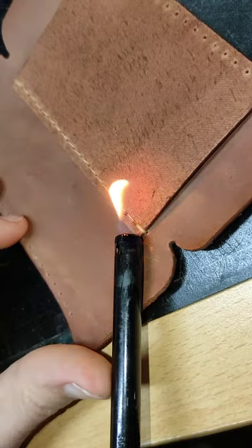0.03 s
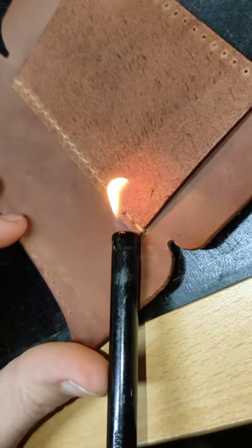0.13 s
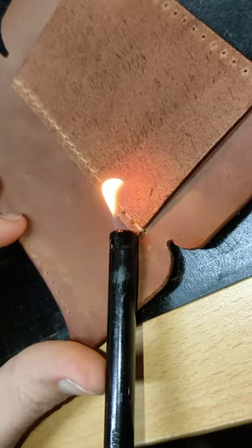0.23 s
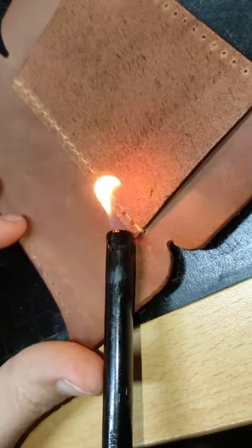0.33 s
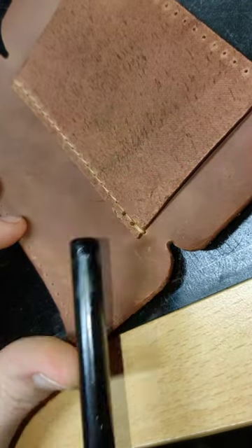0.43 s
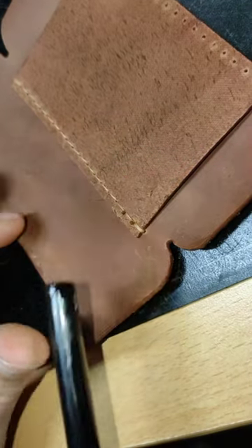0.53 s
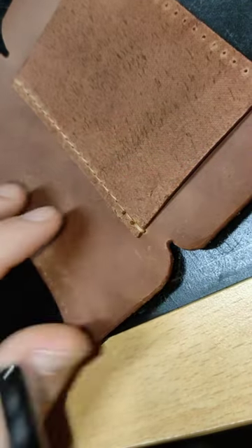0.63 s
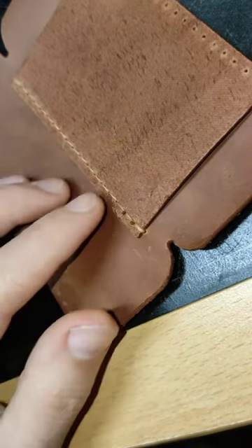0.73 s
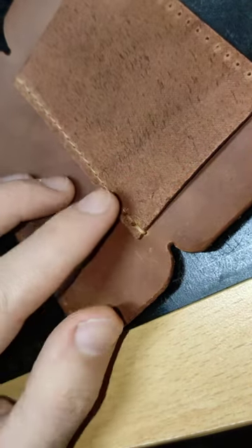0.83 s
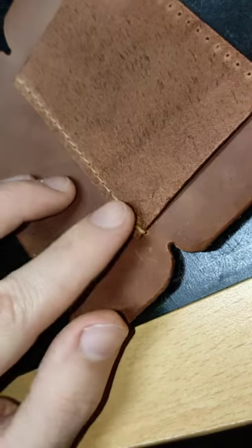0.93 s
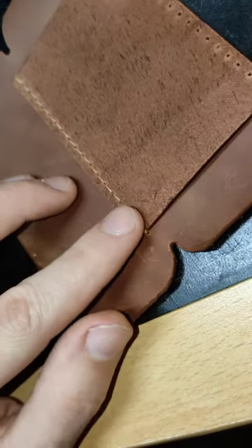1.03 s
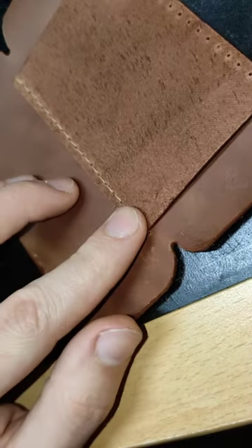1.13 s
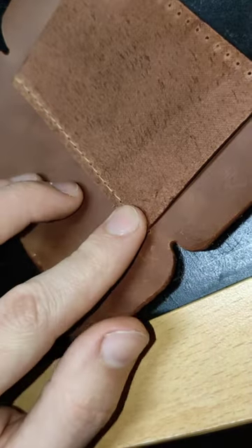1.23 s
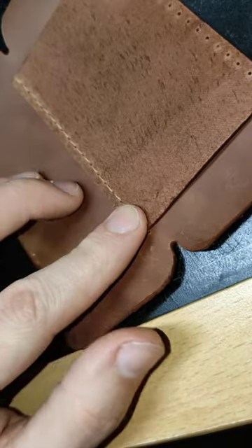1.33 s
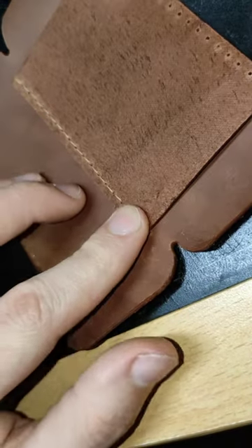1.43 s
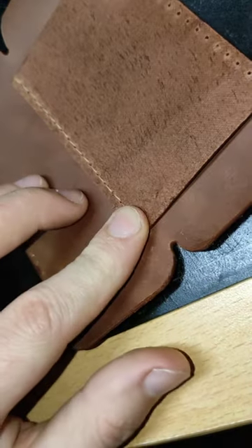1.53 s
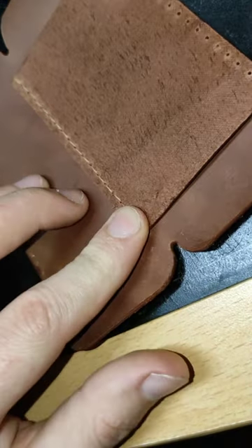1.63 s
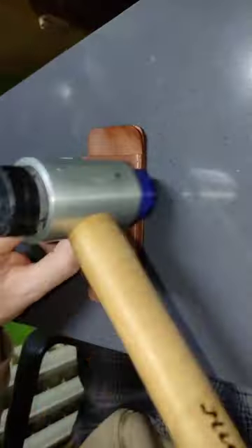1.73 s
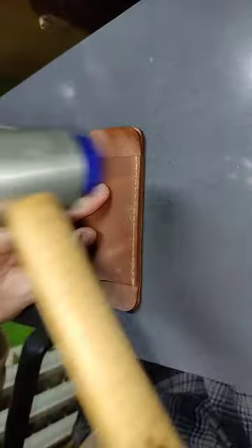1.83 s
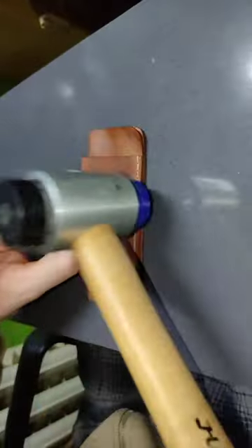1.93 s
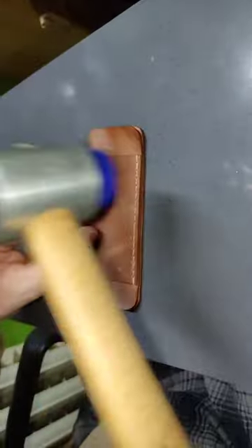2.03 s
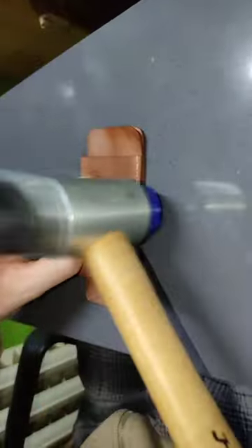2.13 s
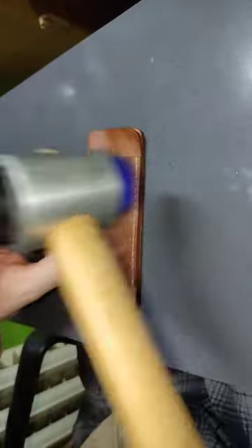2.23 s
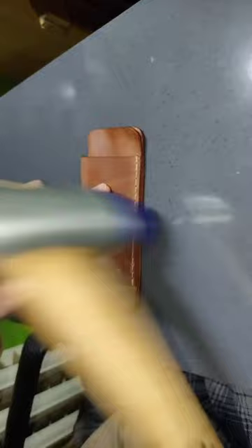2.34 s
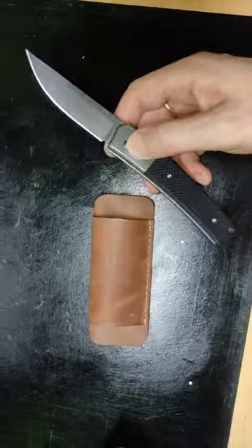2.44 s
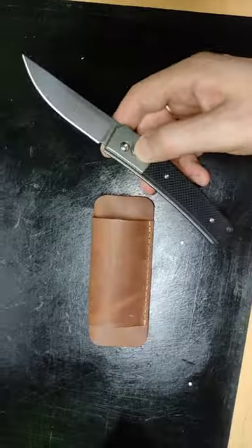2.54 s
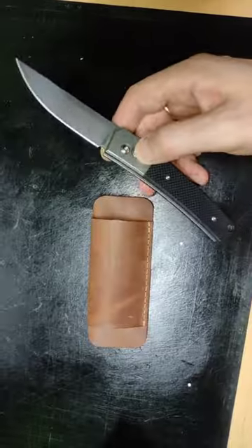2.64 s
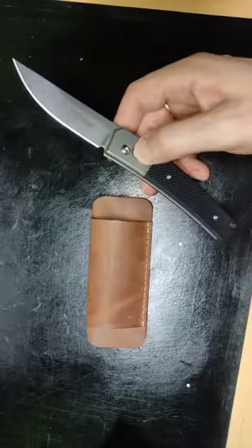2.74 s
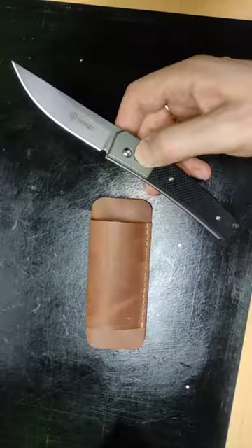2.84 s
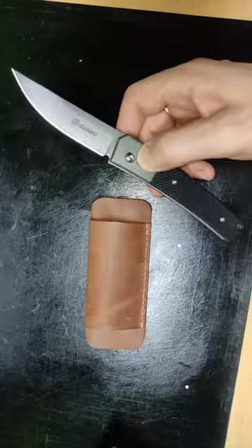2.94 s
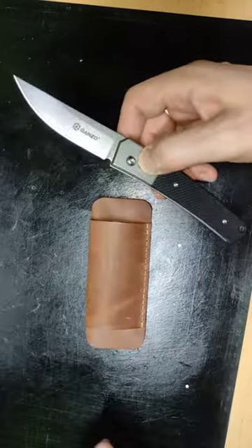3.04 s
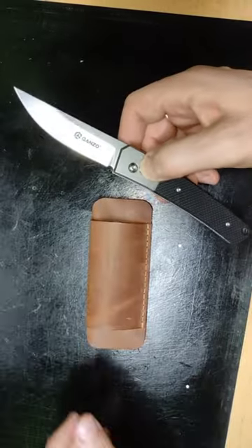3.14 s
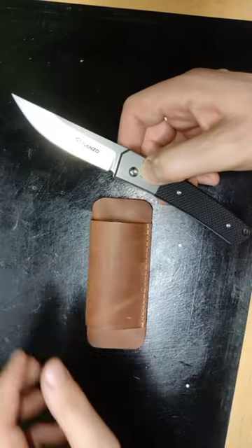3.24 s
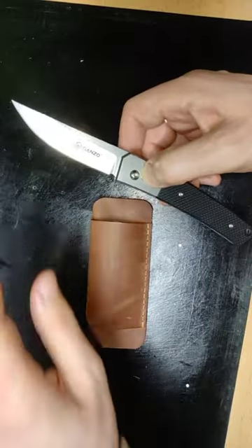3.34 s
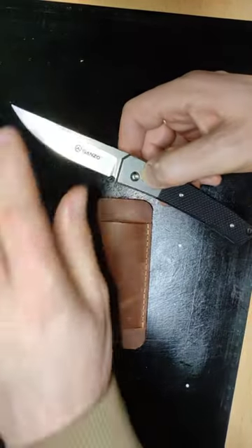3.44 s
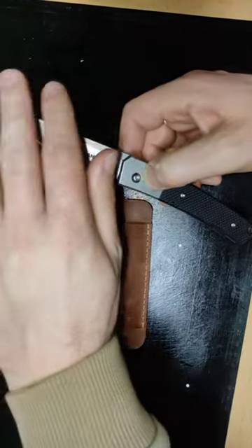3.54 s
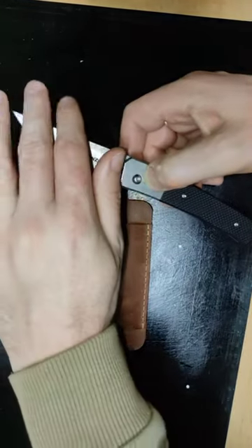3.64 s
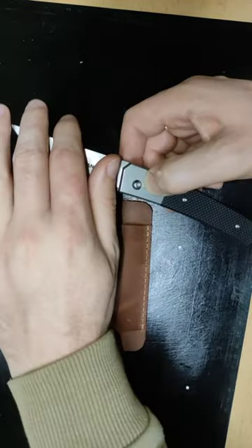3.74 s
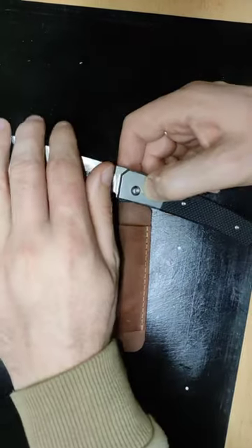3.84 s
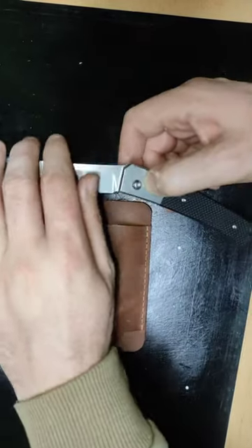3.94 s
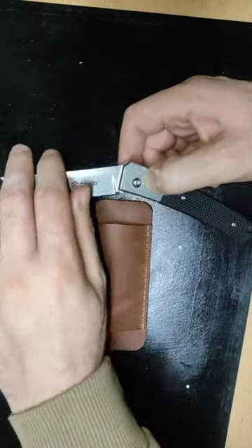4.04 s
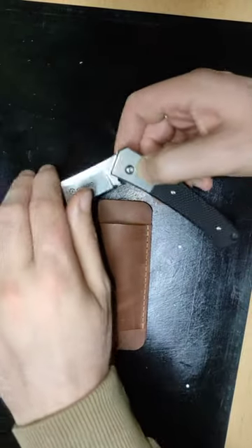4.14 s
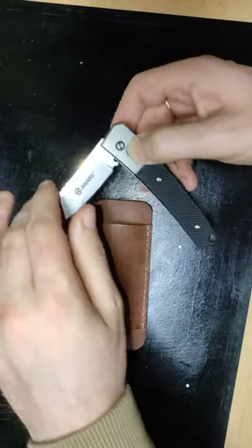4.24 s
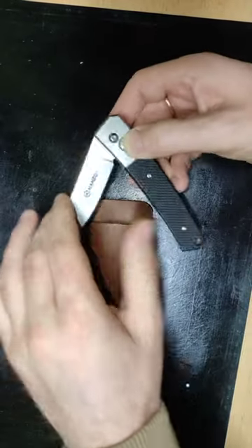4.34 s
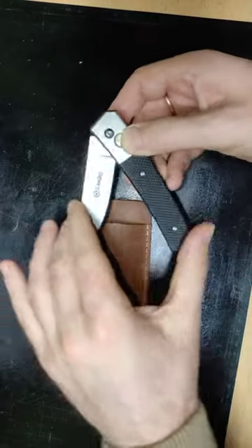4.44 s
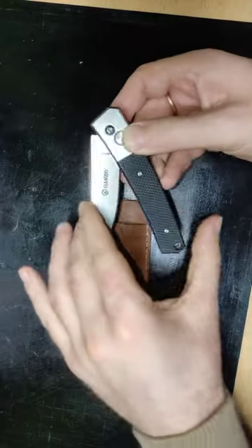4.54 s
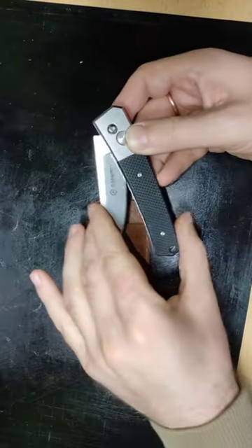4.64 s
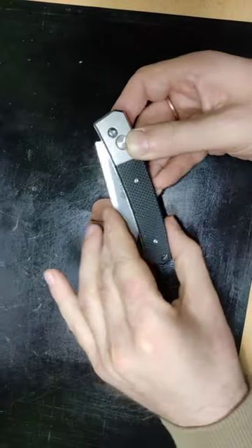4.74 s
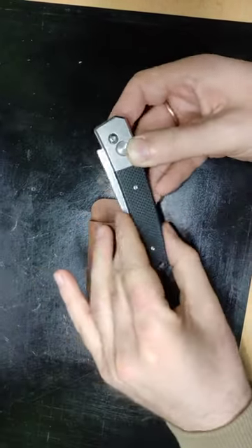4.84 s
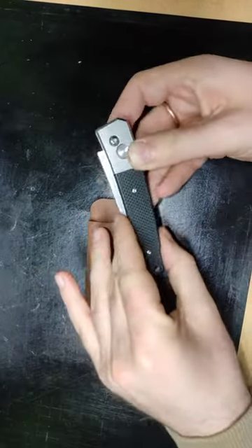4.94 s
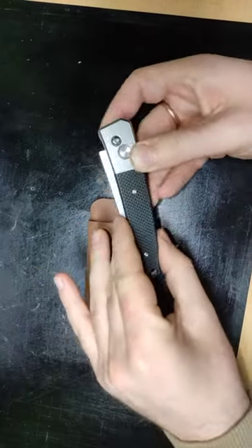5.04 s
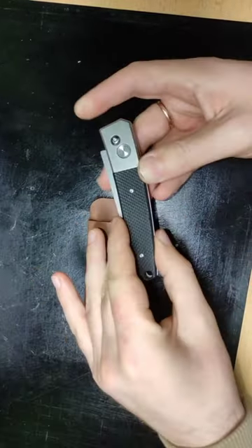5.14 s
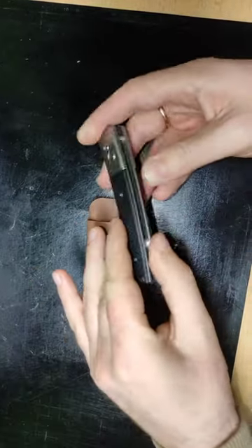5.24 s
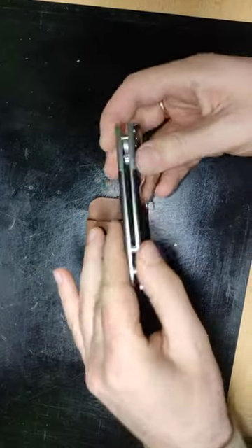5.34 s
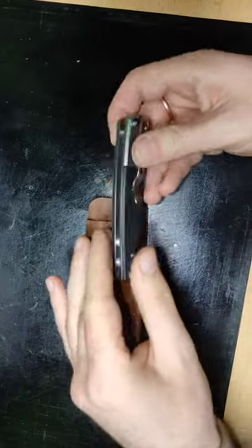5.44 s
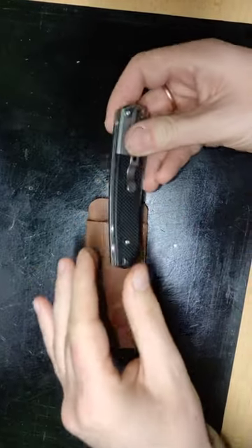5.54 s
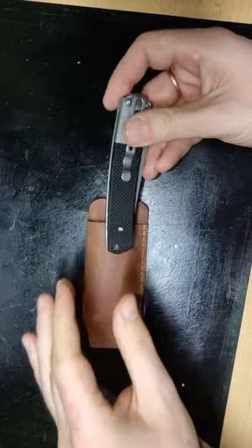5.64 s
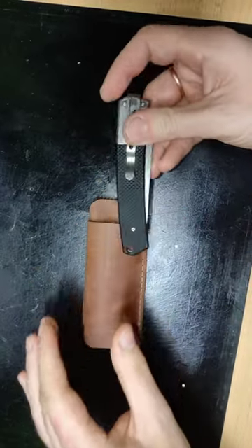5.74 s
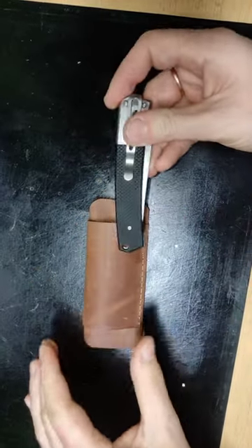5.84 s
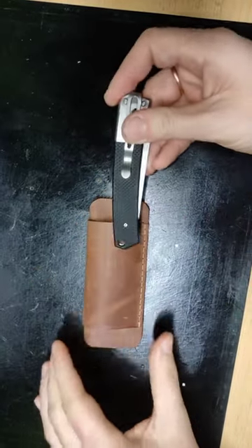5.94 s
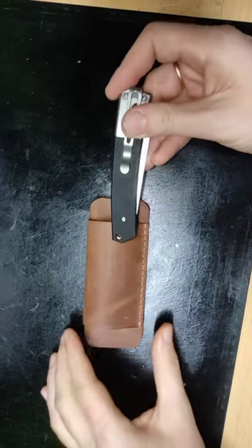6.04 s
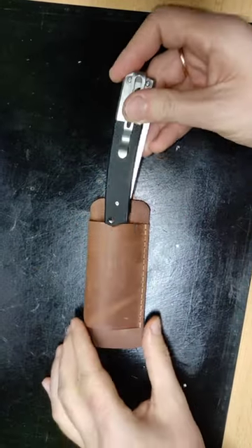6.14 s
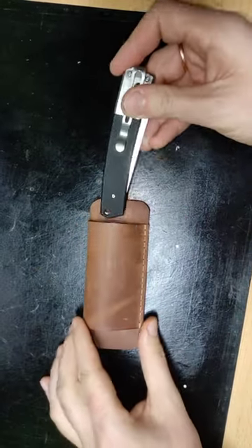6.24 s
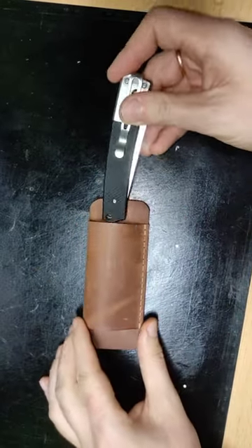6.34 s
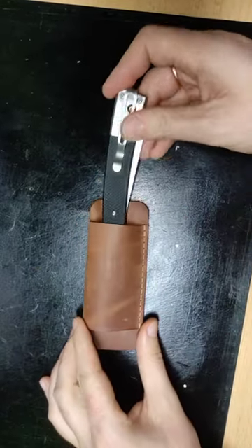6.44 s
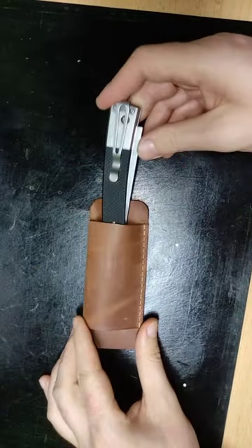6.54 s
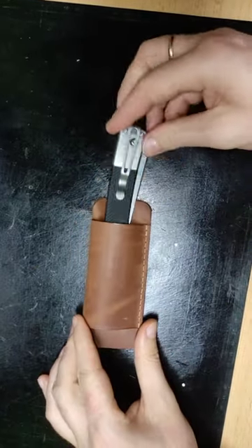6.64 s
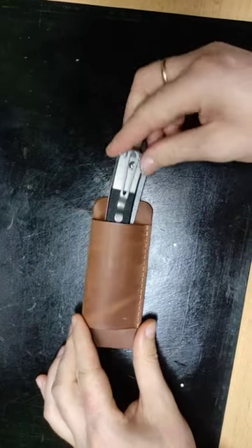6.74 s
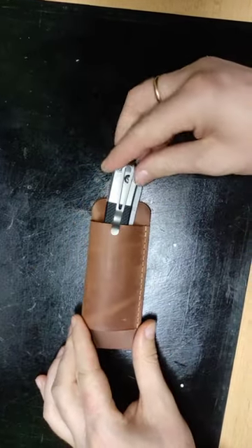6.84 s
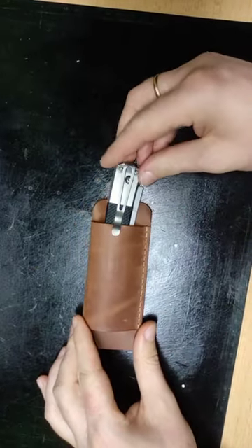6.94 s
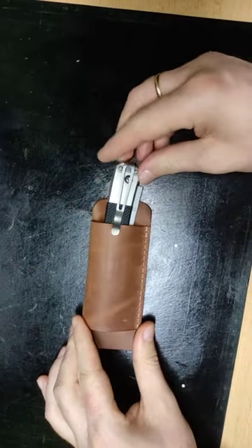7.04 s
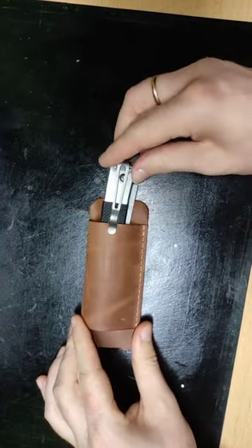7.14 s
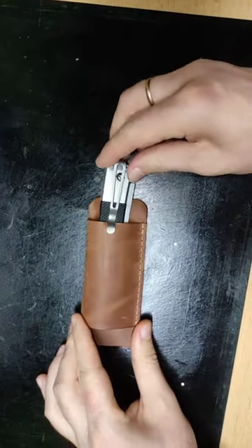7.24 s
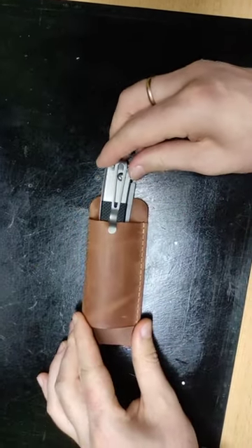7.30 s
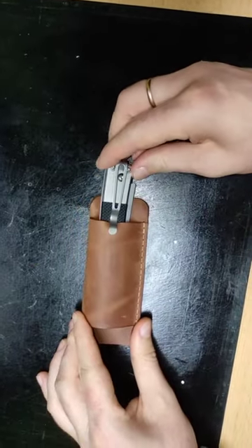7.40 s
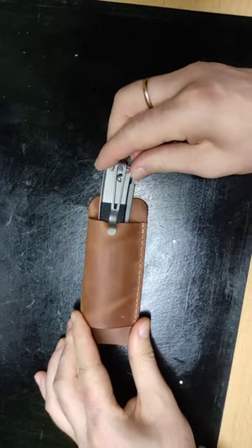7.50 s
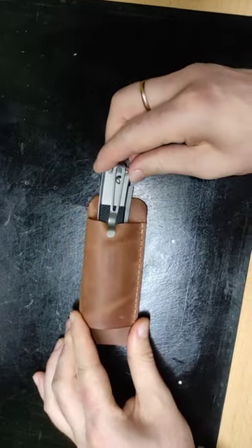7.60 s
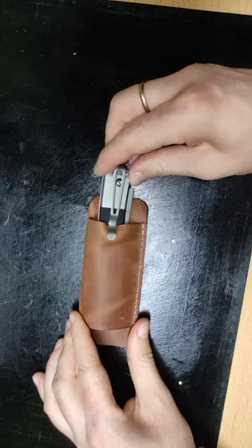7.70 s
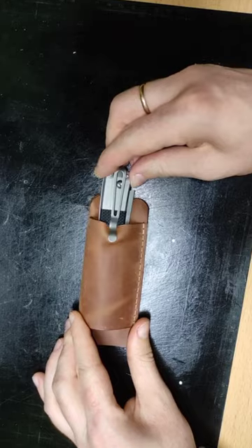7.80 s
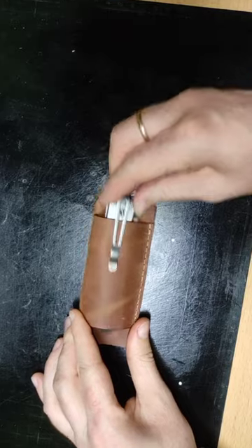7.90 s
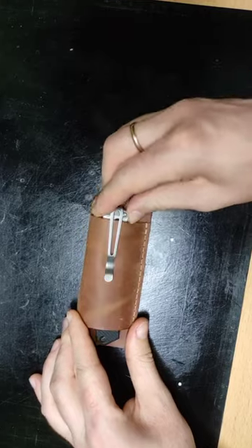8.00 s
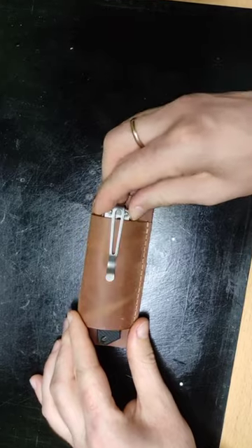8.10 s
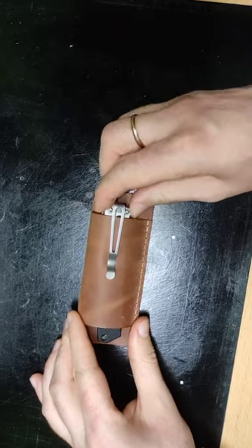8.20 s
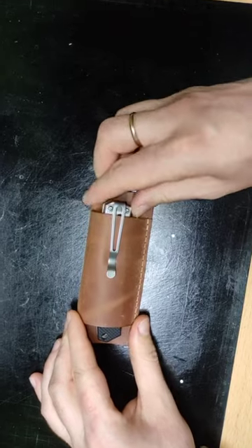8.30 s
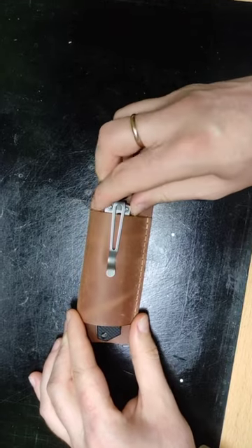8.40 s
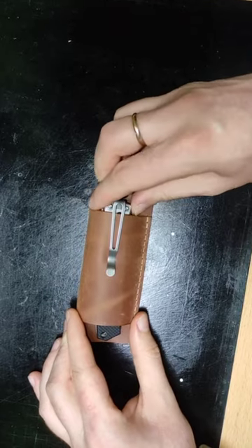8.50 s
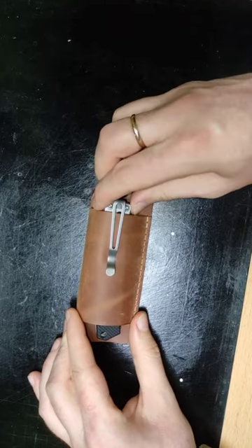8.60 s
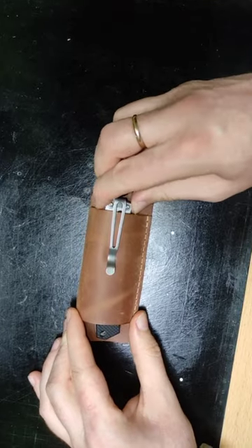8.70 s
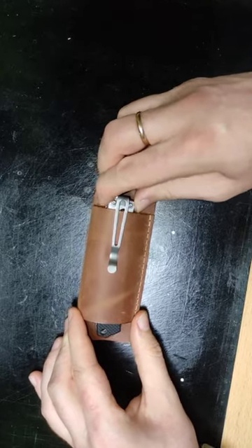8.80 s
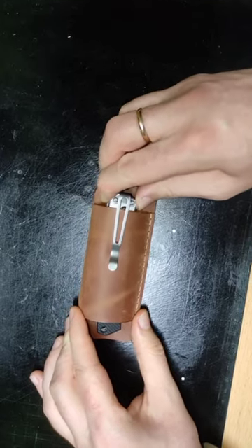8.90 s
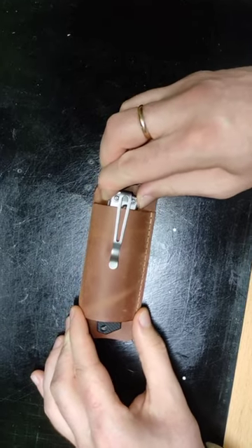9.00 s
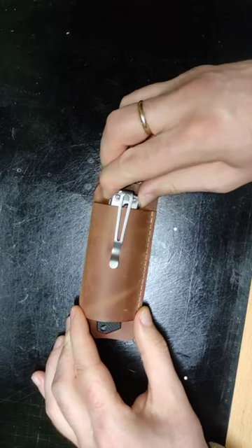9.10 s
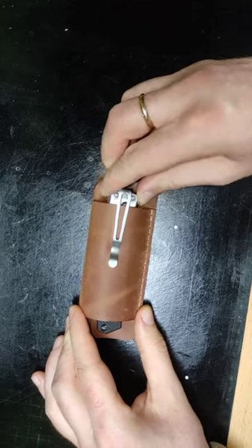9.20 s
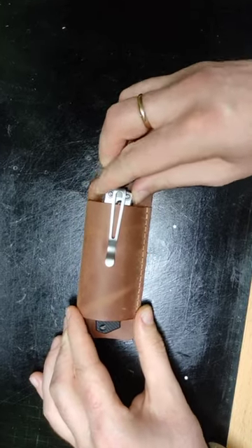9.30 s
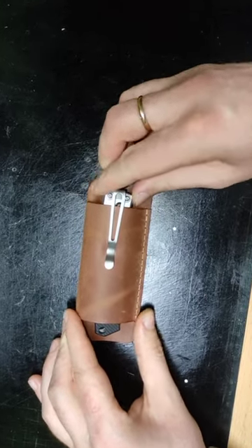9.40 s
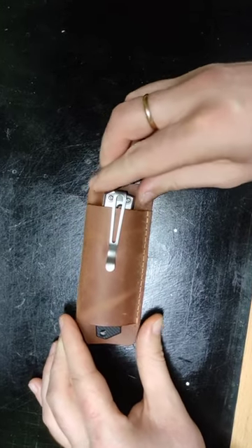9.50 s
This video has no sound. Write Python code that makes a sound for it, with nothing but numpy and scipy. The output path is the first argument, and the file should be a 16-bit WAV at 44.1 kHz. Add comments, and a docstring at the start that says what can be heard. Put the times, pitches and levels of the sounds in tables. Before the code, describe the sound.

Close stereo phone pickup in a small, quiet room with soft low rumble and faint hiss. A lighter trigger clicks sharply around half a second, leaving a faint metallic ring. After a pause, a mallet cracks and thuds four times on leather. A folding knife gives small, faint steel ticks, then slides into a tight sheath with short dry rubs and catches. Two tight pairs of hard bumps knock the phone's holder near the end.

```python
"""Leatherwork close to a phone in a small room, over quiet coloured noise with bumps through the phone's holder.
A lighter clicks at a thread end (noise bursts and damped modes); the grip creeps on steel and leather (slip noise).
A mallet strikes a seam four times (modal thuds, cracks, a handle knock); a folding knife's pivot and lock tick.
Last, the knife is pushed into its tight sheath: filtered slip noise rubs and catches tick."""
import sys
import numpy as np
from scipy import signal
from scipy.fft import rfft, irfft
from scipy.io import wavfile
from scipy.ndimage import uniform_filter1d

SR = 44100
rng = np.random.default_rng(int(sys.argv[2]) if len(sys.argv) > 2 else 0)


def transcribe(signal):
    """Save signal, clipped to [-1, 1], as a 16-bit WAV file at the path in sys.argv[1]."""
    frames = np.atleast_2d(signal).T
    limited = np.clip(frames, -1, 1)
    pcm = np.round(limited * 32767).astype(np.int16)
    wavfile.write(sys.argv[1], SR, pcm)


N = 421596
TIME = np.arange(N) / SR
RING = TIME[:SR // 2 + SR // 4]  # time axis of one struck sound, 0.75 s


def undb(db):
    """Decibels to gain."""
    return 10 ** (np.asarray(db) / 20)


def decay(t, t60_s):
    """Exponential decay by 60 dB in t60_s."""
    return np.exp(-np.log(1000) * t / t60_s)


def at_hz(points, hz):
    """Read (hz, value) points on a log-frequency axis."""
    point_hz, value = np.transpose(points)
    return np.interp(np.log(np.maximum(hz, 1)), np.log(point_hz), value)


def colour(x, points, tilt_db_per_oct=0, size=2048):
    """Minimum-phase filter with the given spectrum, tilted about 4 kHz (tilt is flat below 500 Hz)."""
    hz = np.arange(size // 2 + 1) * SR / size
    db = at_hz(points, hz) + tilt_db_per_oct * np.log2(np.maximum(hz, 500) / 4000)
    # fold the cepstrum to make the filter causal
    cepstrum = irfft(np.log(undb(db)))
    cepstrum[1:size // 2] *= 2
    cepstrum[size // 2 + 1:] = 0
    impulse = irfft(np.exp(rfft(cepstrum)))
    return signal.oaconvolve(x, impulse)[:len(x)]


def unit(x):
    """Scale to standard deviation 1."""
    return x / np.std(x)


def peak(x):
    """Scale to peak 1."""
    return x / np.abs(x).max()


def add(track, start_s, x):
    """Mix a sound into a track at a time."""
    i = int(start_s * SR)
    track[..., i:i + x.shape[-1]] += x[..., :N - i]


def ring(modes):
    """Damped sines of a struck object; successive modes have opposite polarity."""
    out = np.zeros(len(RING))
    for k, (hz, level_db, t60_s) in enumerate(modes):
        t = RING[RING < 2 * t60_s]
        gain = (-1) ** k * undb(level_db)
        out[:len(t)] += gain * decay(t, t60_s) * np.sin(2 * np.pi * hz * t)
    return out


def contact(t60_s, tone, tilt_db_per_oct=0, size=4096):
    """Hard touch: a decaying noise burst of micro-impacts, peak 1."""
    burst = rng.standard_normal(size) * decay(RING[:size], max(t60_s, 1e-3))
    burst = peak(colour(burst, tone, tilt_db_per_oct))
    return np.pad(burst, (0, len(RING) - size))


def walk(rate_hz):
    """Smoothed random wander with spread 1."""
    k = max(int(SR / rate_hz), 1)
    steps = np.repeat(rng.standard_normal(N // k + 1), k)
    return unit(uniform_filter1d(steps, k)[:N])


def swell(start_s, length_s, attack_s, sag_db_per_s, release_s, margin_s=.3):
    """Gain of one rub: it grows up to its start, sags while held, then dies away."""
    gain = np.zeros(N)
    first = max(int((start_s - margin_s) * SR), 0)
    span = slice(first, int((start_s + length_s + margin_s) * SR))
    age_s = TIME[span] - start_s
    rise = np.minimum(age_s, 0) / max(attack_s, 1e-3)
    fall = np.maximum(age_s - length_s, 0) / max(release_s, 1e-3)
    gain[span] = np.exp(rise - fall) * undb(-sag_db_per_s * np.clip(age_s, 0, length_s))
    return gain


def pair(length, apart_hz=900):
    """Diffuse noise at two close ports: alike in the bass, less related in the treble."""
    mid, side = rng.standard_normal((2, length))
    side = colour(side, [(apart_hz / 6, -12), (apart_hz, -3), (2 * apart_hz, 0)])
    return np.array([mid + side, mid - side])


# reverberation time per band: hz, t60_s
REVERB_T60 = [(150, 0.3), (400, 0.35), (1500, 0.28), (6000, 0.31), (14000, 0.089)]
# reverberation spectrum: hz, level_db
REVERB_TONE = [(60, -8.5), (180, 0.5), (380, 1), (800, -3.5), (1500, -6.5), (3000, -5.5), (7000, -3.5),
               (15000, -4)]


def room(build_s=0.00063):
    """Dense reflections from bench and near walls; each band dies at its own rate."""
    noise = rfft(pair(len(RING)))
    hz = np.linspace(0, SR / 2, noise.shape[1])
    centres_hz, t60s_s = np.transpose(REVERB_T60)
    tail = 0
    for share, t60_s in zip(np.eye(len(centres_hz)), t60s_s):
        band = irfft(noise * at_hz(np.c_[centres_hz, share], hz), len(RING))
        tail = tail + band * decay(RING, t60_s)
    tail = tail * np.minimum(RING / build_s, 1) ** 2
    return [colour(side / np.linalg.norm(side), REVERB_TONE) for side in tail]


# shading by the phone's body, left minus right, before each source's shade factor: hz, difference_db
PORT_SHADE = [(150, 0.5), (700, -3.5), (1600, -0.5), (3300, -12), (6500, -18), (9000, -17.5), (13000, -6.5)]


def place(x, lag_ms, shade, room_db, lean_db=1.1):
    """Direct sound reaches the left port later and shaded; the room answers from all round, leaning right."""
    t = TIME[:len(x)]
    late = np.interp(t - lag_ms / 1000, t, x)
    left = colour(late, [(hz, shade * db / 2) for hz, db in PORT_SHADE])
    right = colour(x, [(hz, -shade * db / 2) for hz, db in PORT_SHADE])
    wet = np.array([signal.oaconvolve(x, side)[:len(x)] for side in room()])
    wet_gain = undb(room_db + np.array([[-lean_db], [lean_db]]))
    return np.array([left, right]) + wet_gain * wet


def clicks(events, tone, modes, contact_t60_s, spot_db, spot_t60_s, vary_db=0):
    """Small contacts ring the touched spot and the whole object, whose mode levels may vary per click."""
    track = np.zeros(N)
    for start_s, level_db, tilt_db_per_oct, pitch_hz in events:
        body = ring([(hz, db + vary_db * rng.standard_normal(), t60_s) for hz, db, t60_s in modes])
        touch = contact(contact_t60_s, tone, tilt_db_per_oct)
        spot = ring([(pitch_hz, spot_db, spot_t60_s)])
        add(track, start_s, undb(level_db) * (touch + spot + body))
    return track


def friction(tone, grain_db, patchy_db, rate_hz=3000):
    """Fibres catch and let go: random slips of uneven size, coming in patches."""
    slips = np.zeros(N)
    caught = rng.random(N) < rate_hz / SR
    size_db = grain_db * np.minimum(rng.exponential(size=N)[caught], 4)
    size_db = size_db + patchy_db * walk(90)[caught]
    slips[caught] = rng.standard_normal(N)[caught] * undb(size_db)
    return unit(colour(slips, tone))


# background spectrum: hz, level_db
AIR_TONE = [(15, -49.5), (25, -20.5), (91, -3), (204, -2.5), (246, -5), (445, -9.5), (598, -15),
            (684, -13.5), (970, -19), (1050, -19), (1140, -18.5), (2060, -25), (3000, -25.5), (5140, -30.5),
            (15500, -33)]
AIR_DB = -64.3  # centre of the wander


def air():
    """Room rumble and microphone hiss as one coloured noise pair, wandering slightly in level."""
    noise = np.array([colour(side, AIR_TONE) for side in pair(N, apart_hz=500)])
    return undb(AIR_DB + .4 * walk(5.6)) * noise / np.std(noise.mean(axis=0))


# bumps reaching the phone's holder: start_s, level_db
HOLDER_BUMPS = [(.100, -35.5), (2.866, -38.5), (4.313, -32), (4.709, -40), (4.909, -37.5), (4.930, -38.5),
                (6.991, -35), (7.935, -32.5), (7.995, -32), (8.146, -43), (8.288, -36), (8.720, -37.5),
                (8.803, -36), (8.833, -25), (8.931, -37.5), (9.1392, -8.5), (9.1443, -11), (9.193, -34.5),
                (9.228, -33.5), (9.252, -10), (9.259, -12), (9.459, -27)]
# holder modes felt by the left microphone: hz, level_db, t60_s
HOLDER_LEFT_MODES = [(90, -26, 0.0074), (200, -9, 0.016), (344, 7, .017)]
# holder modes felt by the right microphone: hz, level_db, t60_s
HOLDER_RIGHT_MODES = [(450, -3, 0.0028), (737, 2.5, 0.0075), (1420, 0.5, 0.0039), (3340, 2, 0.0025)]
# spectrum of a catch, also of the holder's tick: hz, level_db
CATCH_SPECTRUM = [(200, -11), (700, -2.5), (1600, 7), (2500, -8.5), (4000, -7), (6300, -9), (9000, -14.5),
                  (12000, -19.5), (15000, -26.5)]
# push time scale at a given level, and the level rise that halves it
PUSH_MS, PUSH_AT_DB, PUSH_HALVING_DB = 1.18, -9, 10.5


def holder(low_hz=80, tick_db=-8, tick_tilt_db_per_oct=-5):
    """Bumps drive the holder's modes, dry; harder pushes are shorter and excite the stiff right side more."""
    track = np.zeros((2, N))
    spring = signal.butter(3, low_hz, "high", fs=SR, output="sos")
    for start_s, level_db in HOLDER_BUMPS:
        push_ms = PUSH_MS * 2 ** ((PUSH_AT_DB - level_db) / PUSH_HALVING_DB)
        age = RING * 1000 / push_ms
        push = signal.sosfilt(spring, age * np.exp(-6 * age))
        left = peak(signal.fftconvolve(push, ring(HOLDER_LEFT_MODES))[:len(RING)])
        right = peak(signal.fftconvolve(push, ring(HOLDER_RIGHT_MODES))[:len(RING)])
        right = right + undb(tick_db) * contact(0.0024, CATCH_SPECTRUM, tick_tilt_db_per_oct)
        right = undb(1.0 - 3.3 * push_ms) * right
        add(track, start_s, undb(level_db) * np.array([left, right]))
    return track


# lighter clicks: start_s, level_db, tilt_db_per_oct, pitch_hz (touched spot)
LIGHTER_CLICKS = [(0.215, -21, 1, 8020), (0.311, -35, -7.5, 4600), (0.343, -38, 2, 3690),
                  (0.401, -35, -2, 8370), (0.4545, -16.5, -0.5, 2690), (0.502, -6.5, -1.5, 3290),
                  (0.545, -30, 1.5, 1500)]
# click and slide spectrum: hz, level_db
LIGHTER_SPECTRUM = [(100, -19), (500, -21), (900, -0.5), (1700, 1.5), (3100, -2.5), (5000, -6),
                    (8300, -5.5), (11000, -7.5), (15000, -16)]
# shell and trigger modes: hz, level_db, t60_s
SHELL_MODES = [(1493, -21, .01), (3184, -18, .006), (4700, -25.5, .007), (8650, -15, 0.014)]
# metal tube modes: hz, level_db, t60_s
TUBE_MODES = [(1250, -44, .66), (1422, -54, 0.27), (4580, -43, .13), (6383, -56, 0.26), (8226, -55.5, 0.23)]
TRIGGER_S, TRIGGER_LENGTH_S, TRIGGER_DB = .428, .04, -50


def lighter():
    """The trigger clicks, slides and snaps back; the hardest snap sets the tube ringing."""
    snaps = clicks(LIGHTER_CLICKS, LIGHTER_SPECTRUM, SHELL_MODES,
                   contact_t60_s=.007, spot_db=-10, spot_t60_s=0.012)
    travel = swell(TRIGGER_S, TRIGGER_LENGTH_S, attack_s=.02, sag_db_per_s=41.5, release_s=.025)
    slide = undb(TRIGGER_DB) * travel * friction(LIGHTER_SPECTRUM, grain_db=-1.0, patchy_db=5.0)
    track = place(snaps + slide, lag_ms=.5, shade=.7, room_db=-7.5, lean_db=1.3)
    hardest_s = max(LIGHTER_CLICKS, key=lambda row: row[1])[0]
    add(track, hardest_s, ring(TUBE_MODES) * undb(np.array([[0], [-4.5]])))  # left, right
    return track


# steel and leather catching: start_s, level_db, tilt_db_per_oct
CATCH_EVENTS = [(1.6783, -38, -6), (6.3863, -40, -1.5), (6.9394, -47, 0.5), (7.0236, -45.5, -2),
                (7.077, -48.5, -0.5), (7.1526, -41.5, 0.5), (7.1646, -39, -2.5), (7.2249, -38, -6.5),
                (7.3417, -47, 0), (7.4321, -40.5, -0.5), (7.4415, -36, 2), (7.5574, -34, 2.5),
                (7.677, -38, 0.5), (7.883, -28.5, 0.5), (8.1108, -46.5, -2), (8.2209, -46, 4.5),
                (8.2857, -33.5, 0), (8.387, -42, -1), (8.4055, -38.5, 0), (8.4582, -32.5, -0.5),
                (8.6044, -42, 1.5), (8.7191, -31, -5), (8.744, -39.5, 5), (8.849, -42, -9),
                (8.8794, -46.5, -6.5), (9.042, -38, -4), (9.0692, -35.5, -0.5), (9.5012, -35, -2)]
# sheath-on-bench modes: hz, level_db, t60_s
SHEATH_MODES = [(215.8, -20.5, 0.17), (850, -16, .01), (1351, -23.5, .006)]
CATCH_HZ, CATCH_SPREAD_OCT = 1450, .2


def catches():
    """Steel snags on leather, each time ringing another spot near one pitch."""
    events = []
    for row in CATCH_EVENTS:
        pitch_hz = CATCH_HZ * 2 ** (CATCH_SPREAD_OCT * rng.standard_normal())
        events.append((*row, pitch_hz))
    return clicks(events, CATCH_SPECTRUM, SHEATH_MODES,
                  contact_t60_s=0.017, spot_db=-14.0, spot_t60_s=0.016, vary_db=4.5)


# grip shifts on steel and leather: start_s, length_s, level_db, body_db (relative)
GRIP_SHIFTS = [(1.679, 0.074, -63.5, 4.5), (3.002, 0.021, -65.5, -12), (3.251, 0.3, -74, -10),
               (4.148, 0.49, -76.5, -3.5), (4.67, 0.059, -73, -13), (5.38, 0.24, -71.5, -23),
               (7.075, .03, -70.5, 4), (7.306, 0.05, -67, 5.5), (7.686, 0.096, -65, 2),
               (8.167, 0.14, -73, 7.5), (8.72, 0.21, -75, 10.5), (9.042, .27, -72.5, 8)]
# rubbing hiss spectrum: hz, level_db
RUB_SPECTRUM = [(400, -18), (1100, -2.5), (1600, -1.5), (2300, -3), (3500, -6), (5500, -7), (8500, -13.5),
                (11000, -15.5), (15000, -19)]
# low body spectrum of rubbing: hz, level_db
BODY_SPECTRUM = [(60, -9.5), (130, -4.5), (215, 3.5), (450, -12.5), (900, -2.5), (1300, -6.5), (1700, -5),
                 (2300, -15), (5000, -41.5)]
GRIP_ATTACK_S, GRIP_SAG_DB_PER_S, GRIP_RELEASE_S = 0.014, 3.5, 0.035


def fingers():
    """Skin and leather creep under a shifting grip: slip noise gated by swells."""
    hiss = friction(RUB_SPECTRUM, grain_db=3.0, patchy_db=4.5, rate_hz=4800)
    body = friction(BODY_SPECTRUM, grain_db=4.5, patchy_db=1.0, rate_hz=270)
    track = 0
    for start_s, length_s, level_db, body_db in GRIP_SHIFTS:
        grip = swell(start_s, length_s, GRIP_ATTACK_S, GRIP_SAG_DB_PER_S, GRIP_RELEASE_S)
        track = track + undb(level_db) * grip * (hiss + undb(body_db) * body)
    return place(track, lag_ms=0.19, shade=0.31, room_db=-1.0, lean_db=3.14)


# mallet contacts, one fainter right after the third blow: start_s, level_db, crack_db (relative)
MALLET_BLOWS = [(1.7427, 1.5, -1), (1.9516, 1.5, -3), (2.1498, 3, -5.5), (2.158, -14, -10.5),
                (2.3695, 0, -0.5)]
# modes rung by each blow (mallet and slab, the one near 364 Hz the phone holder's), before pitch scatter: hz,
# level_db, t60_s
BLOW_MODES = [(54.74, -28, 0.025), (117, -26.5, 0.049), (364, -12.5, 0.025), (637, -17, 0.0074),
              (864, 2.5, 0.0046), (1384, 0.5, .006), (2800, -20, 0.013), (7000, -22, .006)]
# face crack spectrum: hz, level_db
CRACK_SPECTRUM = [(300, -5.5), (1500, -3), (2000, -0.5), (2800, 0.5), (4600, -8), (7000, -7.5),
                  (10000, -10), (15000, -21.5)]
# modes of the head knocking on its handle: hz, level_db, t60_s
HEAD_MODES = [(2850, -3.5, .012), (5250, -11, .008)]
KNOCK_S, KNOCK_DB = 2.1932, -17  # head on handle as the mallet rebounds
MALLET_END_S = 2.382  # the last blow's echo is cut off here


def mallet(scatter=0.044, slap_db=4, crush_db=-7):
    """The face slaps leather and crushes its grain, the slab thuds; mode pitches scatter per blow."""
    track = np.zeros((2, N))
    slap = undb(slap_db) * peak(colour(signal.unit_impulse(len(RING)), CRACK_SPECTRUM))
    for start_s, level_db, crack_db in MALLET_BLOWS:
        modes = [(hz * (1 + scatter * rng.standard_normal()), db, t60_s) for hz, db, t60_s in BLOW_MODES]
        thud = peak(ring(modes))
        thud = np.interp(RING - .0005, RING, thud)  # the leather squashes first
        crack = undb(crush_db) * contact(0.0078, CRACK_SPECTRUM) - slap
        blow = undb(level_db) * (thud + undb(crack_db) * crack)
        add(track, start_s, place(blow, lag_ms=0.15, shade=0.5, room_db=-7.5, lean_db=1.0))
    knock = undb(KNOCK_DB) * (ring(HEAD_MODES) + contact(.008, CRACK_SPECTRUM))
    add(track, KNOCK_S, place(knock, lag_ms=.17, shade=0.41, room_db=-8.5))
    return track * (TIME < MALLET_END_S)


# pivot and lock clicks: start_s, level_db, tilt_db_per_oct, pitch_hz (touched spot)
KNIFE_CLICKS = [(2.8611, -42.5, -3.5, 6480), (2.9629, -51.5, -1, 6430), (3.0199, -48, 0.5, 4990),
                (3.184, -37, 6, 6830), (4.6792, -44.5, 2.5, 3773), (4.8475, -26, 4, 8850),
                (5.1587, -37, 7, 3800), (5.5438, -45.5, 1.5, 3550)]
# click spectrum: hz, level_db
KNIFE_SPECTRUM = [(200, -11), (700, 4.5), (1300, 19), (2500, -10.5), (4500, -5), (7000, -10.5), (9000, -5),
                  (12000, -7), (15000, -7)]
# steel part modes: hz, level_db, t60_s
STEEL_MODES = [(1210, -17.5, 0.025), (1840, -17, .03), (3800, -43, .035), (6483, -25.5, 0.04),
               (8800, -40, 0.044), (13200, -22, 0.028)]


def knife():
    """Pivot and lock tick: short contacts ring the steel parts."""
    ticks = clicks(KNIFE_CLICKS, KNIFE_SPECTRUM, STEEL_MODES,
                   contact_t60_s=0.038, spot_db=-14.5, spot_t60_s=0.038)
    return place(ticks, lag_ms=0.27, shade=1.05, room_db=-5.5, lean_db=2.5)


# knife pushes into the sheath: start_s, length_s, level_db, body_db (relative), pocket_db (relative)
SHEATH_STROKES = [(6.402, 0.037, -56.5, 4.5, 12.5), (6.457, 0.057, -58, -4.5, -14),
                  (6.574, 0.056, -54.5, 1, 6), (6.654, 0.074, -59, -2.5, 3), (6.752, 0.083, -53, -2, -2),
                  (7.139, 0.037, -63, 8, -4), (7.893, 0.076, -46, 4.5, -0.5), (8.404, 0.011, -65, 19.5, -5),
                  (8.46, 0.013, -70.5, 16.5, 7), (8.523, 0.037, -66, 5.5, 12)]
# rubbing resonance before its pitch falls: hz, level_db
POCKET_SPECTRUM = [(1200, -39), (1540, -1.5), (1690, 2.5), (1830, -23), (2300, -57)]
STROKE_ATTACK_S, STROKE_SAG_DB_PER_S, STROKE_RELEASE_S = .011, 15, 0.015
POCKET_FALL_OCT_PER_S = 0.11  # the rubbing resonance slowly falls in pitch over time


def sheath():
    """Steel drags through leather: slip hiss, low body and a resonance slowly falling in pitch, plus catches."""
    hiss = friction(RUB_SPECTRUM, grain_db=-1.5, patchy_db=-0.5, rate_hz=6000)
    body = friction(BODY_SPECTRUM, grain_db=-0.5, patchy_db=5.5, rate_hz=630)
    pocket = friction(POCKET_SPECTRUM, grain_db=1.0, patchy_db=4.5, rate_hz=1400)
    # slow the resonant noise down from the first stroke on
    speed = 2 ** (-POCKET_FALL_OCT_PER_S * np.maximum(TIME - SHEATH_STROKES[0][0], 0))
    pocket = np.interp(np.cumsum(speed) / SR, TIME, pocket)
    track = catches()
    for start_s, length_s, level_db, body_db, pocket_db in SHEATH_STROKES:
        push = swell(start_s, length_s, STROKE_ATTACK_S, STROKE_SAG_DB_PER_S, STROKE_RELEASE_S)
        rub = hiss + undb(body_db) * body + undb(pocket_db) * pocket
        track = track + undb(level_db) * push * rub
    return place(track, lag_ms=0.24, shade=1.007, room_db=-1.5, lean_db=1.5)


def scene():
    """All sources at the two ports."""
    return air() + holder() + lighter() + fingers() + mallet() + knife() + sheath()


def record(dry, ceiling=.82, dip_hz=11100, dip_db=-6, low_hz=30, top_hz=15550):
    """The sound is soft-limited, thin in deep bass, weaker near 11 kHz and dull at the top."""
    held = dry / (1 + (dry / ceiling) ** 4) ** (1 / 4)
    held = signal.sosfilt(signal.butter(2, low_hz, "high", fs=SR, output="sos"), held)
    dip = [(.88 * dip_hz, 0), (dip_hz, dip_db), (1.1 * dip_hz, 0)]
    voiced = [colour(side, dip) for side in held]
    return signal.sosfilt(signal.ellip(8, .2, 70, top_hz, fs=SR, output="sos"), voiced)


dry = scene()
out = record(dry)
transcribe(out)
```